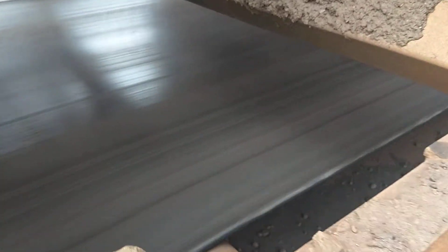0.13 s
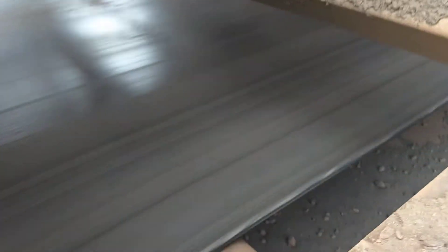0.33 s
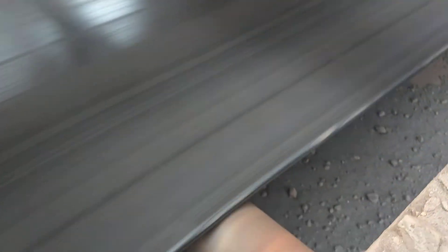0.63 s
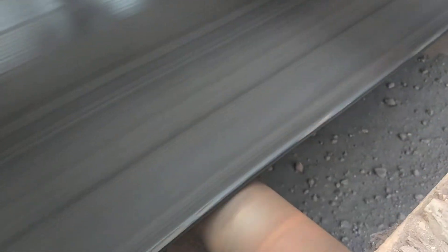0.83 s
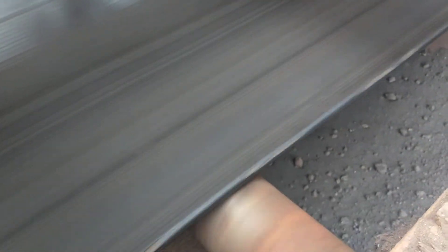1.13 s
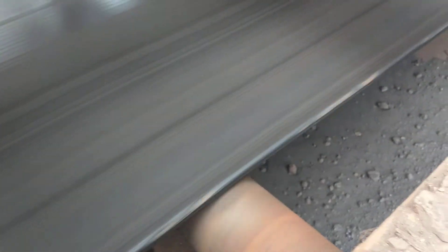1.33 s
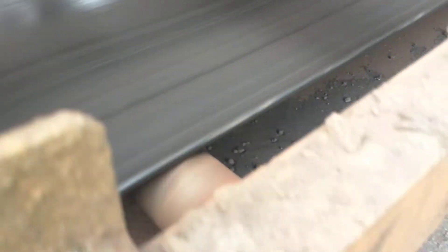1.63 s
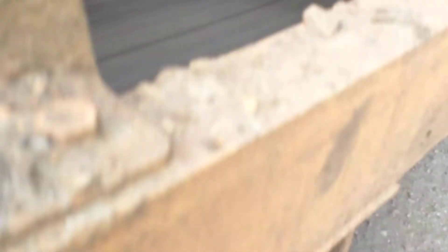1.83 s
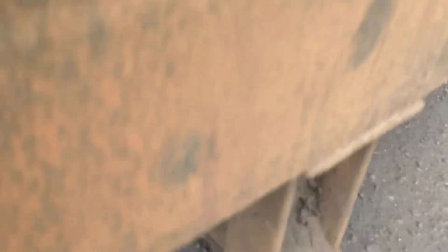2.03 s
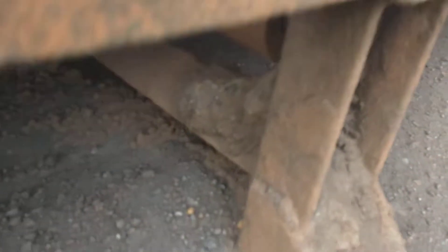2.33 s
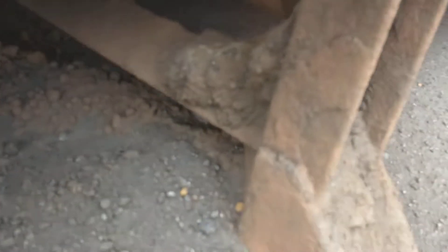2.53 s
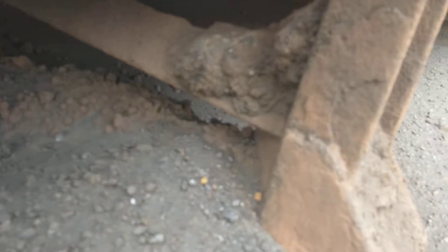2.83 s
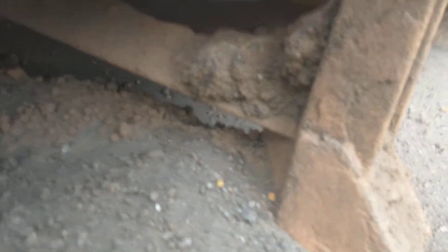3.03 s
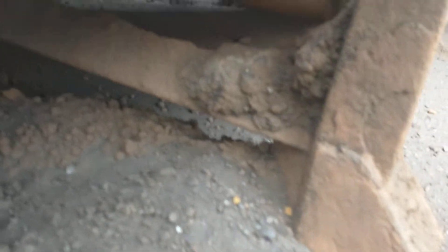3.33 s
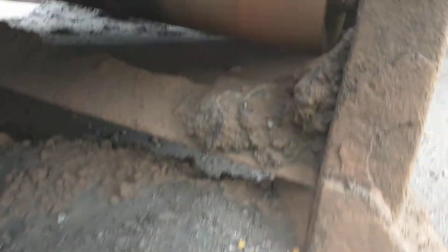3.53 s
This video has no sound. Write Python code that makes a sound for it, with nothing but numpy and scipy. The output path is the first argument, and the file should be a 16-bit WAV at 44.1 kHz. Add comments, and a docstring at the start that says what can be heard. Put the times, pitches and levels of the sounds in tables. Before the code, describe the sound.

Running conveyor belt with low rumble, hollow roller ring and dull slaps, under heavy wind buffeting.

```python
"""A rubber conveyor belt rumbles and rushes over steel rollers while wind buffets both microphone ports.
Flickering noise bands make belt and wind; resonators ring the roller; bent tones make clinks and squeaks.
The belt slaps in decaying sines, grit ticks in bright noise; a buffet is a short pressure swing.
A hand-held recorder moves from above the belt to below the frame, heard as changing levels.
After most hard buffets the level drops and creeps back. Each channel gets a late, inverted copy of the other."""
import sys
import numpy as np
from scipy import signal
from scipy.fft import rfft, irfft, next_fast_len
from scipy.io import wavfile

SR = 44100
rng = np.random.default_rng(int(sys.argv[2]) if len(sys.argv) > 2 else 0)


def transcribe(signal):
    """Save signal, clipped to [-1, 1], as a 16-bit WAV file at the path in sys.argv[1]."""
    frames = np.atleast_2d(signal).T
    limited = np.clip(frames, -1, 1)
    pcm = np.round(limited * 32767).astype(np.int16)
    wavfile.write(sys.argv[1], SR, pcm)


N = 163170

# left-right likeness of belt and roller noise: freq_hz, correlation (-1 to 1)
LIKENESS = [(100, 0.97), (250, 1), (450, 0.78), (650, 0.68), (900, 0.28), (1400, -0.12), (2300, 0.079),
            (3500, 0.084), (5800, -0.077), (12000, 0.18)]


def amp(db):
    """Decibels to amplitude."""
    return 10 ** (np.asarray(db) / 20)


def rms_one(x):
    """Scale to rms 1 over all channels."""
    return x / np.sqrt(np.mean(x ** 2) + 1e-20)


def in_time(rows):
    """Interpolate each column against the first, start_s."""
    start_s, *columns = np.transpose(rows)
    return [np.interp(np.arange(N) / SR, start_s, column) for column in columns]


def at_hz(points, hz):
    """Interpolate a curve over log frequency."""
    freq_hz, value = np.transpose(points)
    return np.interp(np.log(hz), np.log(freq_hz), value)


def drift(rate_hz):
    """Slow chance of rms 1: noise through a two-pole lowpass, run at SR / 40."""
    pole = np.exp(-2 * np.pi * rate_hz * 40 / SR)
    noise = rng.standard_normal(N // 40 + 2002)
    slow = signal.lfilter([1], [1, -2 * pole, pole * pole], noise)[2000:]  # settled part
    return np.interp(np.arange(N) / 40, np.arange(len(slow)), rms_one(slow))


def resonate(x, hz, width_hz):
    """Two-pole resonance of about unit gain at its peak."""
    r = np.exp(-np.pi * width_hz / SR)
    poles = [2, -4 * r * np.cos(2 * np.pi * hz / SR), 2 * r * r]
    return signal.lfilter([1 - r * r, 0, r * r - 1], poles, x)


def correlate(mid, side, likeness):
    """Stereo noise of a given left-right likeness from two independent noises."""
    alike = np.clip(likeness, -.99, .99)
    return np.sqrt(1 + alike) * mid + np.sqrt(1 - alike) * side * [[1], [-1]]


def bands(spectrum, likeness, shared_db, own_db, shared_hz, own_hz):
    """Third-octave bands of stereo noise that flicker together and alone; rms 1."""
    together_db = shared_db * drift(shared_hz)
    mid, side = rfft(rng.standard_normal((2, N)))
    hz = np.arange(N // 2 + 1) * SR / N + 1e-3
    spec = amp(at_hz(spectrum, hz)) * correlate(mid, side, at_hz(likeness, hz))
    centres_hz = 20 * 2 ** np.arange(0, 10, 1 / 3)
    in_range = (centres_hz > spectrum[0][0] / 2) & (centres_hz < spectrum[-1][0] * 1.3)
    out = 0
    for centre_hz in centres_hz[in_range]:
        share = np.clip(1 - 3 * abs(np.log2(hz / centre_hz)), 0, 1)  # overlapping triangles
        flicker_db = together_db + own_db * drift(own_hz)
        out = out + amp(flicker_db) * irfft(spec * share, N)
    return rms_one(out)


def belt():
    """Belt on rollers: low rumble and bright rush, both flickering noise, slightly left."""
    # belt levels: start_s, rumble_db, rush_db
    belt_levels = [(0, -18.5, -43.5), (.12, -18.5, -40.5), (.3, -16.5, -42.5), (.36, -17, -43),
                   (.6, -21, -47.5), (.95, -18, -44.5), (1.3, -17.5, -43.5), (1.6, -18.5, -45.5),
                   (1.99, -20.5, -48), (2.04, -20.5, -49.5), (2.3, -23, -53), (2.6, -22.5, -51.5),
                   (2.9, -20, -46.5), (3.2, -17, -45), (3.45, -15.5, -45.5), (3.7, -16, -44.5)]
    # rumble spectrum: freq_hz, density_db (per Hz)
    rumble_spectrum = [(40, -10), (90, 2.5), (170, 7), (300, -0.5), (450, 0), (650, -4.5), (900, -10),
                       (1300, -13.5), (1800, -18), (2500, -23.5), (3500, -29), (6000, -43.5)]
    # rush spectrum: freq_hz, density_db (per Hz)
    rush_spectrum = [(1200, -10), (2200, -3.5), (3200, -12.5), (4500, -15), (6500, -5.5), (8500, -13),
                     (11000, -18.5), (13000, -18), (16000, -19)]
    rumble_pan_db, rush_pan_db = 3, 1  # left minus right
    half = np.array([[.5], [-.5]])
    rumble_db, rush_db = in_time(belt_levels)
    rumble = bands(rumble_spectrum, LIKENESS, 0.69, 1.4, 13.5, 15.6)
    rush = bands(rush_spectrum, LIKENESS, 1.35, 1.0, 8.5, 24.0)
    return rumble * amp(rumble_db + rumble_pan_db * half) + rush * amp(rush_db + rush_pan_db * half)


def roller():
    """Grit shakes the steel: noise through paired resonators, each ring wavering in level."""
    # roller and frame resonances: pitch_hz, width_hz (of each resonator), level_db
    resonances = [(495.6, 33, -41), (1147, 25, -55.5), (1732, 102, -49.5), (3155, 59, -65.5),
                  (3480, 83, -61.5), (5130, 65, -67.5), (5854, 64, -66)]
    # nearness of the roller: start_s, gain_db
    nearness = [(0, 8.5), (1.9, 5), (2.3, -4.5), (3.7, 3.5)]
    waver_db, waver_hz = 2.0, 9.8
    mid, side = rng.standard_normal((2, N))
    rings = 0
    for hz, width_hz, level_db in resonances:
        grit = correlate(mid, side, at_hz(LIKENESS, hz))
        ring = rms_one(resonate(resonate(grit, hz, width_hz), hz, width_hz))
        rings = rings + amp(level_db + waver_db * drift(waver_hz)) * ring
    return rings * amp(in_time(nearness)[0])


def wind():
    """Turbulence at the ports: lumpy low noise, independent at each."""
    # wind levels: start_s, left_db, right_db
    wind_levels = [(0, -12, -20), (.15, -14, -22), (.35, -15, -20), (.52, -22, -24), (.8, -19, -23),
                   (.92, -16, -22), (1.2, -20, -21), (1.38, -16, -20), (1.5, -15, -21), (1.8, -19, -21),
                   (1.98, -12, -19), (2.1, -11, -18), (2.2, -15, -18), (2.38, -14, -18), (2.55, -21, -21),
                   (2.75, -19, -17), (3.0, -21, -19), (3.3, -19, -18), (3.45, -16, -13), (3.7, -16, -12)]
    # wind spectrum: freq_hz, density_db (per Hz)
    wind_spectrum = [(25, -17), (50, -2), (100, 0), (150, -3), (200, -7), (300, -12), (500, -21),
                     (900, -38)]
    alike = [(20, 1), (40, 0.98)]  # only one channel of each pair is used
    left, right = (bands(wind_spectrum, alike, 3.0, 0.58, 5.6, 1.9)[0] for _ in range(2))
    return amp(in_time(wind_levels)) * [left, right]


def ticks():
    """Grit cracks under the belt: sharp decaying bright noise, plus stray one-sample clicks."""
    # grit ticks: start_s, level_db (before the highpass), decay_s
    tick_rows = [(.1, -36, .002), (.222, -48, .002), (.306, -48, .002), (.699, -50, .002),
                 (.909, -49, .002), (.986, -42, .018), (1.649, -39, .002), (2.715, -50, .002),
                 (2.907, -47, .002), (2.948, -49, .002)]
    highpass_hz, stray_per_s, stray_floor_db = 9000, 40, -38
    shape, t = np.zeros(N + SR), np.arange(SR // 20) / SR
    for start_s, level_db, decay_s in tick_rows:
        start = int(start_s * SR)
        shape[start:start + len(t)] += amp(level_db) * np.exp(-t / decay_s)
    stray_db = stray_floor_db + 4.0 * np.minimum(rng.exponential(1, N), 3)
    stray = (rng.random(N) < stray_per_s / SR) * amp(stray_db)
    grit = (shape[:N] + stray) * rng.standard_normal((2, N))
    highpass = signal.butter(2, highpass_hz, "high", fs=SR, output="sos")
    return signal.sosfilt(highpass, grit + 1e-18)


def buffets():
    """A cycle or two of pressure, opposite and weaker at one port; also returns the level drop in dB."""
    # wind buffets: centre_s, level_db, pitch_hz, pan_db (left minus right), drop_db (negative: a rise)
    buffet_rows = [(.083, -4, 100, 16, 4.5), (.324, 1, 152, 24, 8.5), (0.926, -3, 148, 23, 3.5),
                   (1.264, -7, 170, -13, -0.5), (1.385, -15, 150, 2, 0), (1.499, 0.5, 110, 30, 1.5),
                   (1.633, -3, 200, 30, -.5), (1.709, -3, 135, 7, -1), (1.92, -1.5, 120, 30, -0.3),
                   (2.013, 0, 200, 29, 7.5), (2.08, -2, 119, 12, 1.6), (2.325, -2, 111, 8, 2.5),
                   (2.468, -4.5, 145, 23, 0), (2.721, -3, 155, -20, 0.5), (2.941, -7, 180, -27, -0.2),
                   (3.228, -1, 222, -30, 5), (3.41, -2.5, 136, -25, 2.5), (3.491, -2, 170, -22, -0.5),
                   (3.527, -14, 175, -25, 1), (3.595, -5, 180, 5, 1.5), (3.632, -6, 150, -15, -1)]
    spread_cycles, drop_lag_s, drop_s, recover_s = 0.51, 0.0027, 0.002, 0.21
    out, total_drop_db, t = np.zeros((2, N)), np.zeros(N), np.arange(N) / SR
    for centre_s, level_db, hz, pan_db, drop_db in buffet_rows:
        phase = rng.uniform(0, 2 * np.pi)
        cycles = hz * (t - centre_s)
        push = np.exp(-(cycles / spread_cycles) ** 2 / 2) * np.cos(2 * np.pi * cycles + phase)
        port_pan_db = np.array([[pan_db], [-pan_db]])
        out += amp(level_db + np.minimum(0, port_pan_db)) * np.sign(port_pan_db) * push
        since_s = np.maximum(t - centre_s - drop_lag_s, 0)
        total_drop_db += drop_db * (1 - np.exp(-since_s / drop_s)) * np.exp(-since_s / recover_s)
    return out, total_drop_db


def slaps():
    """Belt slaps a roller: dull sine knocks of a few cycles, alike at both ports."""
    # belt slaps: start_s, level_db (before trim_db), pitch_hz
    slap_rows = [(0.243, -14, 500), (0.843, -15.5, 700), (1.023, -13, 623), (1.226, -6.5, 380),
                 (1.353, -3.5, 460), (1.385, -12, 514), (1.597, -6, 410), (1.639, -10, 417),
                 (2.545, -9, 402), (2.757, -18, 482), (3.078, -11, 345), (3.396, -6, 418)]
    rise_s, trim_db = 0.0031, -6.5
    out, t = np.zeros(N + SR), np.arange(SR // 10) / SR
    envelope = t / rise_s * np.exp(1 - t / rise_s)  # peaks at 1
    for start_s, level_db, hz in slap_rows:
        start = int(start_s * SR)
        knock = envelope * np.sin(2 * np.pi * hz * t)
        out[start:start + len(t)] += amp(level_db + trim_db) * knock
    return out[:N]


def chirps():
    """Clinks and squeaks: short shaky tones bent in pitch, some rattling, over a broad noise scuff."""
    # clinks and squeaks: start_s, length_s, pitch_hz (middle), rise_hz (at both ends),
    # level_db, scuff_db, rattle_hz (0: none)
    chirp_rows = [(.974, .024, 3150, -60, -26.5, -46, 0), (.999, .017, 3200, 0, -34, -50, 140),
                  (1.568, .034, 3150, 50, -41, -55, 45), (1.631, .04, 3130, 150, -31, -53, 133),
                  (2.726, .008, 3900, 300, -37, -55, 0), (2.43, .06, 11600, 500, -65, -75, 0),
                  (2.9, .085, 11800, 900, -58, -75, 0), (3.145, .09, 11850, 400, -54, -75, 0),
                  (3.63, .09, 11800, 500, -60, -75, 0)]
    wobble_share, rough_db, shake_hz = .015, 2.0, 120.0
    right_lag_s, right_gain, rattle_depth, fade = .000042, .7, .75, .6
    out, grit = np.zeros((2, N)), rng.standard_normal((2, N))
    wobble = 1 + wobble_share * drift(shake_hz)
    rough = amp(rough_db * drift(shake_hz))
    for start_s, length_s, hz, rise_hz, level_db, scuff_db, rattle_hz in chirp_rows:
        start, length = int(start_s * SR), int(length_s * SR)
        span = slice(start, start + length)
        part = np.linspace(0, 1, length)[:N - start]
        pitch_hz = (hz + rise_hz * (2 * part - 1) ** 2) * wobble[span]
        lag_cycles = hz * right_lag_s * np.array([[0], [1]])
        tone = rough[span] * np.sin(2 * np.pi * (np.cumsum(pitch_hz) / SR - lag_cycles))
        beats = 1 - rattle_depth * (rattle_hz > 0) * np.cos(np.pi * rattle_hz * length_s * part) ** 2
        envelope = np.sin(np.pi * part) ** 0.28 * (1 - fade * part) * beats
        voice = amp(level_db) * tone * [[1], [right_gain]] + amp(scuff_db) * grit[:, span]
        out[:, span] += envelope * voice
    return out


def scene():
    """Sum all sources; the level drops act on everything."""
    pushes, drop_db = buffets()
    total = belt() + roller() + wind() + ticks() + pushes + slaps() + chirps()
    return total * amp(-drop_db)


def record(dry):
    """Cut deep bass, subtract the other channel late, round peaks, cut the top."""
    # share of the other channel: freq_hz, share (0 to 1)
    cross_share = [(60, .76), (1150, .82), (2300, .78), (3500, .66), (4500, .9), (4700, .99), (5800, .85),
                   (7000, .95), (9300, .9), (11500, .66), (13800, .4), (16000, .4)]
    low_cut_hz, cross_lag_s, top_cut_hz, peak_limit = 45, 0.0004318, 15740, 1.2
    highpass = signal.butter(3, low_cut_hz, "high", fs=SR, output="sos")
    dry = signal.sosfilt(highpass, dry)
    size = next_fast_len(N + 512)
    hz = np.arange(size // 2 + 1) * SR / size + 1e-3
    late = np.clip(at_hz(cross_share, hz), 0, 1) * np.exp(-2j * np.pi * hz * cross_lag_s)
    wide = dry - irfft(rfft(dry[::-1], size) * late, size)[:, :N]
    rounded = peak_limit * np.tanh(wide / peak_limit)
    lowpass = signal.ellip(14, .5, 70, top_cut_hz, fs=SR, output="sos")
    return signal.sosfilt(lowpass, rounded)


dry = scene()
out = record(dry)
transcribe(out)
```